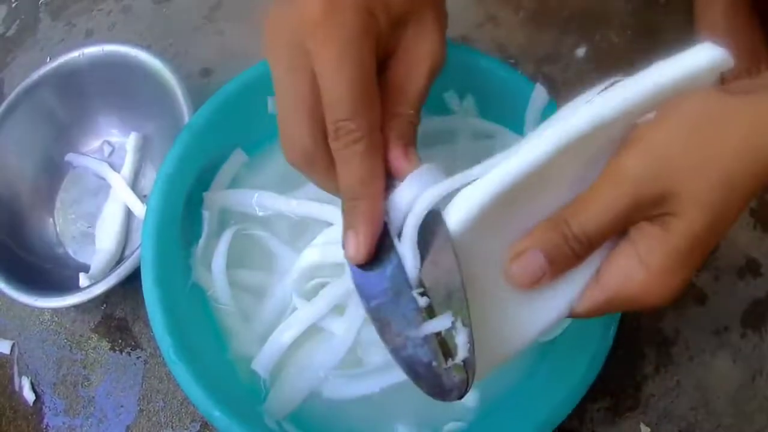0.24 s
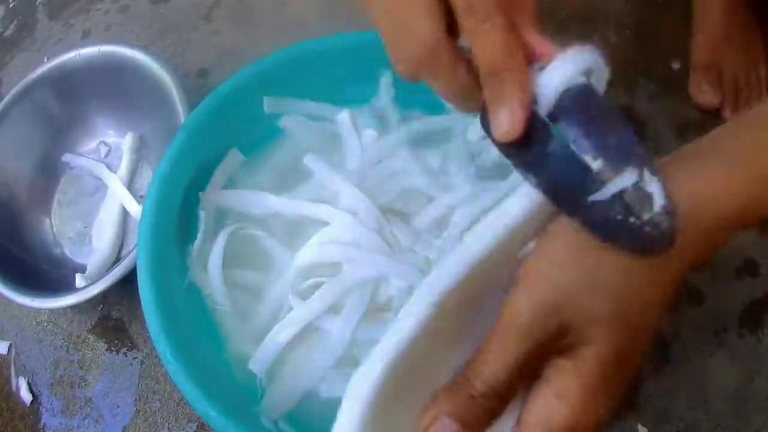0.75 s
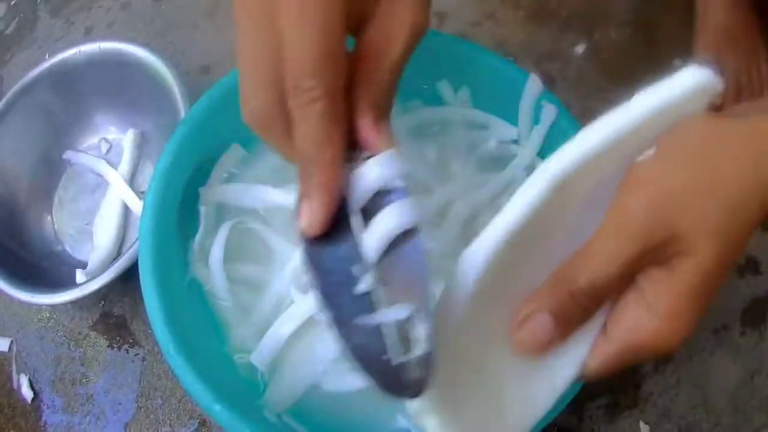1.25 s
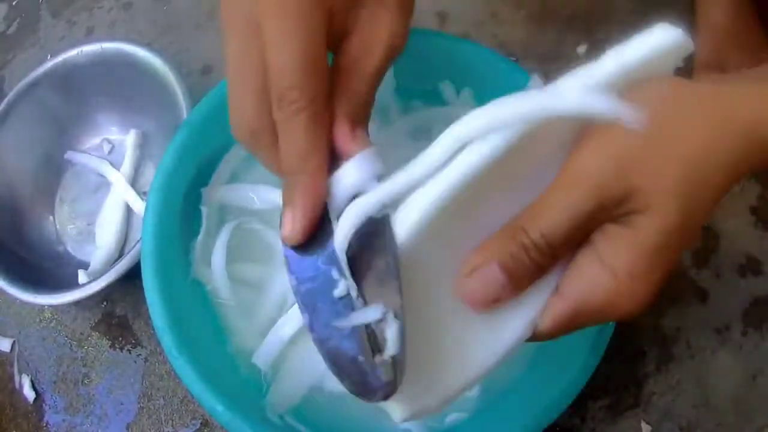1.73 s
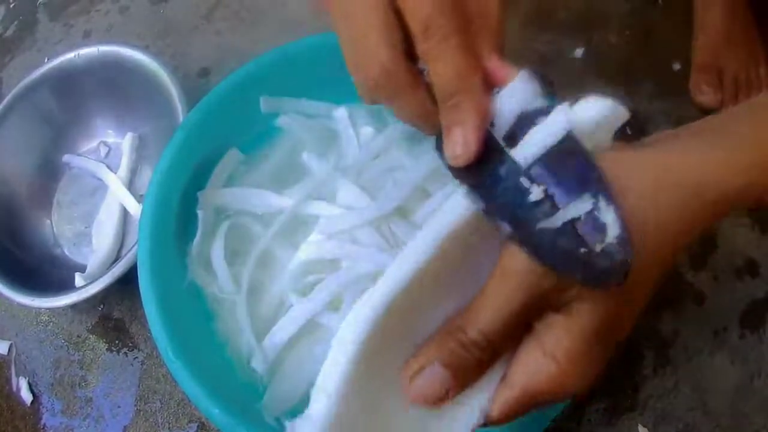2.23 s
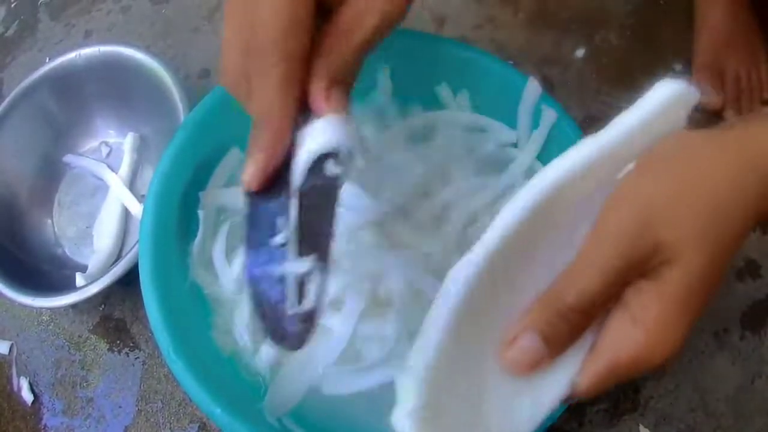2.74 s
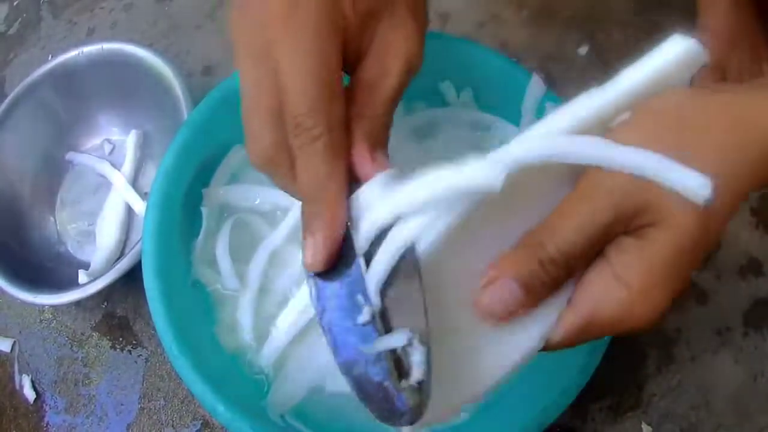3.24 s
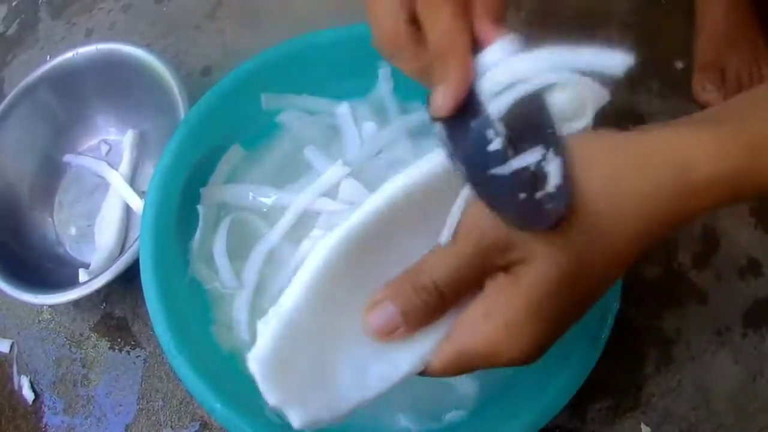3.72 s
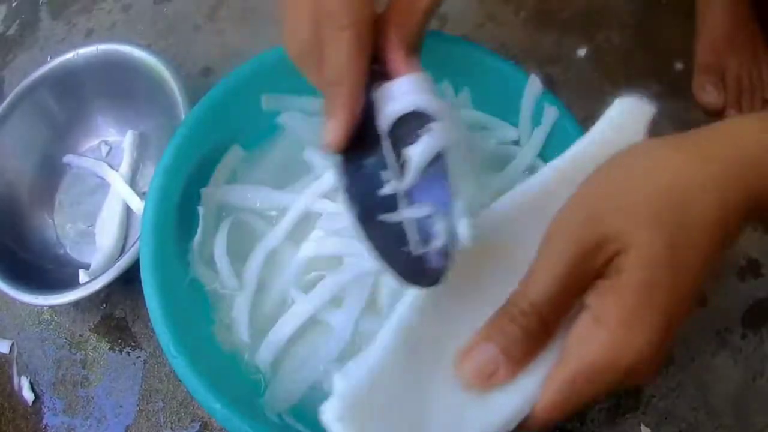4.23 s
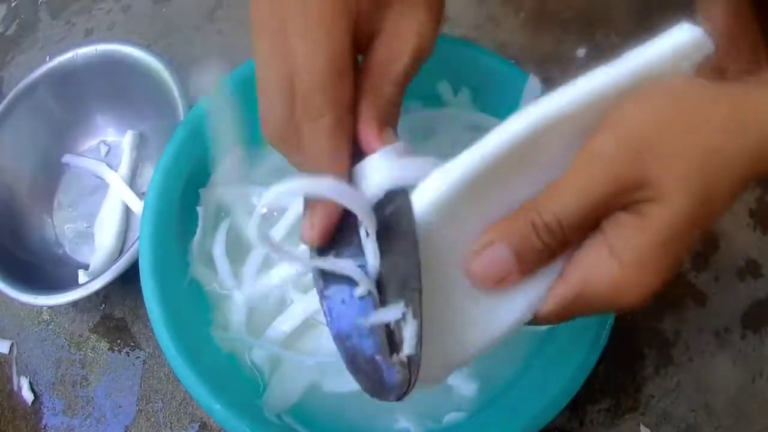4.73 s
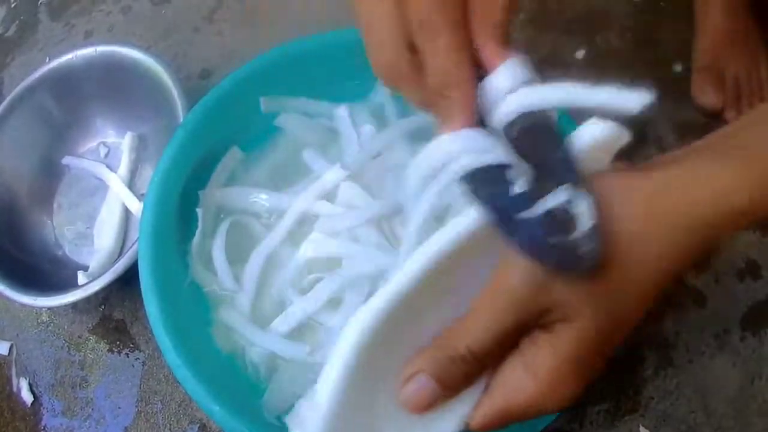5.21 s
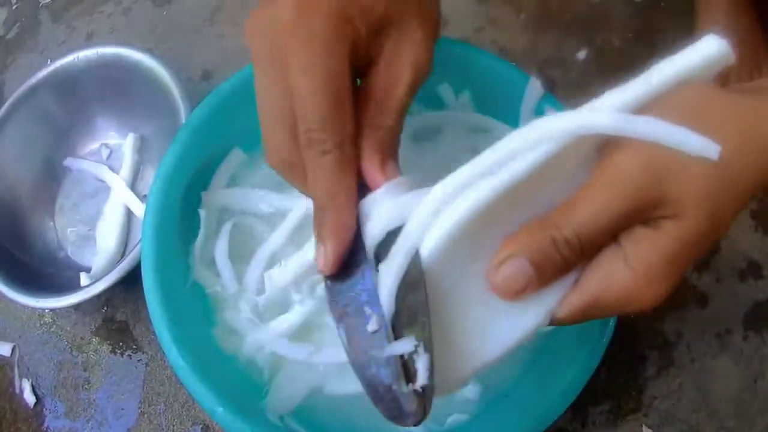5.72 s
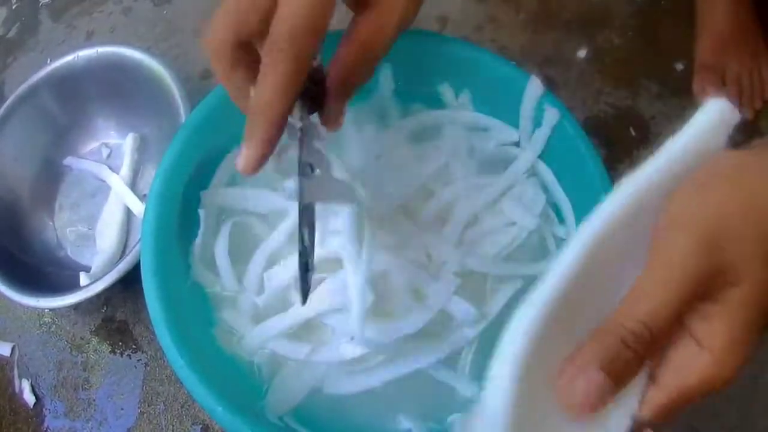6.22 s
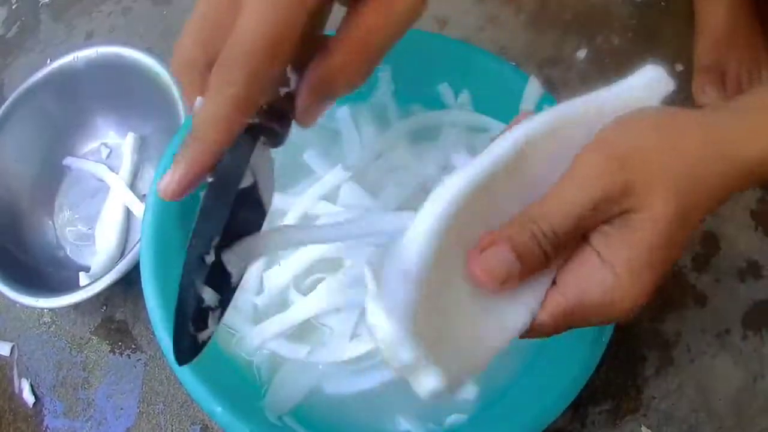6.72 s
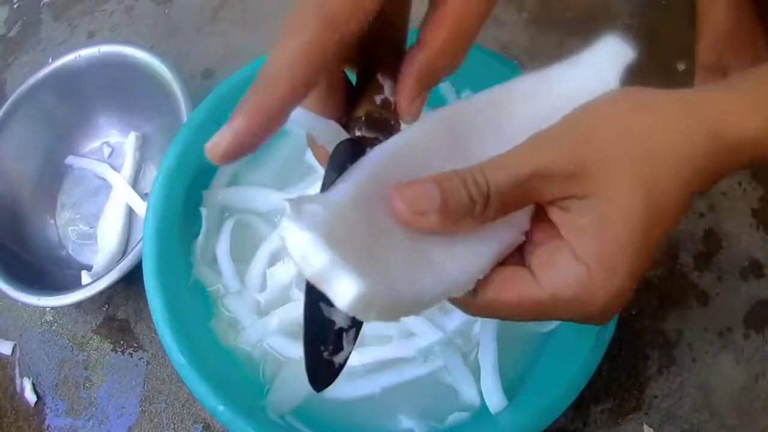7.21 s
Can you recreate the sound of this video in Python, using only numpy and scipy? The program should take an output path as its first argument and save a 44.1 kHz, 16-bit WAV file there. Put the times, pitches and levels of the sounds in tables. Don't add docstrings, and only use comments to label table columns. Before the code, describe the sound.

Repeated short tearing scrapes of a steel blade through firm coconut flesh, hollow clacks on the return, quick bird whistles and soft yard hum.

```python
import sys
import numpy as np
from scipy import signal
from scipy.fft import rfft, irfft
from scipy.io import wavfile
from scipy.ndimage import uniform_filter1d

SR = 44100
rng = np.random.default_rng(int(sys.argv[2]) if len(sys.argv) > 2 else 0)


def ratio(d):
    e = np.asarray(d, float) / 20
    return 10 ** e


def output_pcm(signal):
    pcm = np.clip(np.atleast_2d(signal).T, -1, 1) * 32767
    wavfile.write(sys.argv[1], SR, np.round(pcm).astype(np.int16))


N = 329074
T = np.arange(N) / SR


# start_s, length_s, pressure_db, bite_s (after the start), blade_ring_db (at the bite)
CUTS = [
    (0.03, .2, -53.5, 0.067, -50),
    (0.867, 0.22, -55, 0.062, -51.5),
    (1.568, .252, -53.5, 0.047, -48.5),
    (2.257, 0.22, -53, 0.035, -48),
    (3.076, .213, -54, 0.028, -48.5),
    (3.798, 0.206, -53, 0.06, -52.5),
    (4.527, 0.25, -55.5, 0.13, -51.5),
    (5.433, 0.25, -54, 0.029, -47.5),
]
# blade_ring_db, wet_hiss_db
BRUSH_TOUCHES = [(0.418, 0.07, -54, 0, -6.5), (0.519, .03, -53.5, -17, -17), (1.139, 0.044, -59, -5, -2.5),
                 (1.191, 0.038, -44, -23, -22), (1.874, 0.031, -60.5, -12, -6),
                 (2.632, 0.032, -55.5, -6, 2.5), (2.938, 0.057, -68, -2.5, -8),
                 (3.333, 0.033, -49, -9.5, -4.5), (3.363, .022, -51, -13, -9),
                 (4.02, 0.028, -56.5, -4, -4.5), (4.052, 0.039, -54, -4, -2.5),
                 (4.817, 0.069, -56, -3, -0.5), (4.985, .028, -59, -2, -2.5), (5.249, 0.025, -57, -15, -22),
                 (5.701, 0.074, -59, -4, -3), (5.85, 0.047, -52.5, -3, 2), (6.685, 0.087, -66, -4.5, -6),
                 (6.858, 0.067, -67, -8, -11), (1.413, 0.068, -59.5, -16, -16),
                 (2.857, 0.047, -67.5, -12, -12)]
# pitch_hz, width_hz, level_db
SLAB_MODES = [(770, 280, 0), (975, 350, 11.5), (1170, 110, 8.5), (1500, 280, 1)]
# pitch_hz, width_hz, level_db
OVERTONE_MODES = [(1910, 133, 4.5), (2194, 380, -2), (2830, 500, -9.5), (3250, 720, -11)]
# pitch_hz, width_hz, level_db
BLADE_MODES = [(4450, 570, -6.5), (4724, 93, -2.5), (4830, 520, 1), (5340, 490, -2)]
# pitch_hz, width_hz, level_db
TIP_MODES = [(5850, 260, 10), (6200, 290, -2.5)]
# pitch_hz, level_db
WET_OUTLINE = [(6300, -2), (7200, 0), (8300, 3.5), (9500, -1.5), (10700, -5.5), (12700, -5.5),
               (14000, -10.5), (15400, -15)]


def shredding():
    spots = np.linspace(WET_OUTLINE[0][0], WET_OUTLINE[-1][0], num=14)
    strips = [(hz, 520, np.interp(hz, *np.transpose(WET_OUTLINE))) for hz in spots]
    layers = [
        body(fibres(5000, 2.0, 2.5), BLADE_MODES, 1.8, 18),
        body(fibres(3500, 1.5, 2.2), SLAB_MODES, 2.5, 14),
        body(fibres(3000, 1.63, 2.8), OVERTONE_MODES, 1.1, 16),
        body(fibres(8000, 1.0, 3.0), strips, 3.0, 28),
        body(fibres(5000, 1.5, 2.5), TIP_MODES, 2.5, 18),
    ]
    gains = np.zeros((len(layers), N))
    for touch_levels, rows in ((cut, CUTS), (brush, BRUSH_TOUCHES)):
        for start_s, length_s, *how in rows:
            t = T[:int((length_s + 0.012) * SR)]
            fade = signal.windows.tukey(len(t), 0.1)
            for gain, db in zip(gains, touch_levels(t, length_s, *how)):
                add(gain, start_s, fade * ratio(db))
    hand = ratio(1.85 * walk(35))
    return np.sum(gains * layers, axis=0) * hand


def cut(t, length_s, pressure_db, bite_s, ring_db):
    land_s, lift_s, edge_db = 0.016, 0.012, -22
    lead_s = 0.015
    catch_s = 0.036
    choke_s, choke_db = 0.079, -6.5

    def contact(late_s):
        times = [late_s, late_s + land_s, length_s - lift_s, length_s + lift_s]
        return np.interp(t, times, [edge_db, 0, 0, edge_db])

    dig = 3.5 * (t / length_s - 0.5)
    pressure = pressure_db + contact(lead_s) + dig
    skim = -17 * np.clip((bite_s - t) / catch_s, 0, 1)
    ring_level = ring_db + contact(0) + skim
    sag = -30 * np.maximum(t - bite_s, 0)
    choke = choke_db * np.clip(1 - (length_s - t) / choke_s, 0, 1)
    blade = ring_level + sag + choke
    gathered = 57 * min(bite_s, 0.08)
    juice = np.interp(t - bite_s, [-catch_s, 0.008, 0.0043 + 0.085], [-21, -5, 0])
    wet = pressure_db + contact(0) - 2.5 + gathered + juice
    tip = ring_level - 23 + 14 * t / length_s
    return [blade, pressure, pressure - 2, wet, tip]


def brush(t, length_s, pressure_db, ring_db, wet_db):
    place = t / length_s
    swell = 1 - place / 0.41
    fade = (place - 1) / 0.44 + 0.5
    pressure = pressure_db - 17 * np.clip(np.maximum(swell, fade), 0, 1)
    blade = pressure + ring_db
    return [blade, pressure, pressure - 7.5, pressure + wet_db, blade - 8.5]


def fibres(per_s, scatter_db, judder_db):
    tears = rng.random(N) < per_s / SR
    sizes = ratio(scatter_db * rng.exponential(size=N)) * rng.standard_normal(N)
    return tears * sizes * ratio(judder_db * walk(90))


# start_s, peak_db, pitch_hz, rattle_db
EDGE_STRIKES = [
    (0.512, -19.5, 1300, -43),
    (1.185, -11.5, 1300, -24.5),
    (2.681, -10, 1287, -34.5),
    (3.403, -12.5, 1314, -25.5),
    (5.048, -20, 1266, -42),
]
# start_s, peak_db, pitch_hz, low_modes_db, high_modes_db
FLAT_TAPS = [(0.657, -27.5, 1100, 7, 3.5), (0.882, -40, 1070, -12, -18), (1.225, -17, 1080, -4, -9),
             (1.237, -5, 1146, -2.5, -10.5), (1.255, -50, 1150, -7, -23), (1.318, -42, 1150, -13, -3),
             (1.518, -48, 1080, -13, -4), (1.887, -64.5, 1410, -2, -16), (3.411, -30, 1210, -4, 2),
             (3.419, -19, 1234, -10.5, -15), (3.43, -30, 1210, -3, -5), (3.474, -33, 1250, -10.5, -2.5),
             (4.075, -39, 1153, 3, -17), (4.999, -46, 1170, 6, -15), (5.021, -35.5, 1050, -16, -17),
             (5.032, -52, 1120, -11, -5), (5.206, -35, 1230, -14, -3), (5.909, -41, 1500, -6, -4),
             (1.969, -46.5, 1500, -8, -5), (2.067, -45, 1500, -12, 3), (2.112, -53, 1500, -12, 0),
             (5.192, -48, 1500, -12, 0)]
# pitch_hz, level_db, fade_s (time to fall 60 dB)
SLAB_LOW = [(718, -5, 0.02), (821, 3, 0.017)]
# pitch_hz, level_db, fade_s (time to fall 60 dB)
SLAB_HIGH = [(1470, -1, 0.015), (1840, 6.5, 0.012), (2240, -6, 0.019), (2920, -23, 0.044)]
# pitch_hz, level_db, fade_s (time to fall 60 dB)
BASIN_THUMP = [(305, -21, 0.031)]


def knocks():
    out, thump, rattle = np.zeros((3, N))
    t = T[:int(0.08 * SR)]
    push_s, flex_s, main_fade_s = 0.00051, 0.00172, 0.012
    push = np.diff(np.hanning(int(push_s * SR) + 2))
    flex = np.diff(np.hanning(int(flex_s * SR) + 2))
    settle = ratio(-9 / (1 + np.exp((0.0068 - t) / 0.0006)))
    grip = (1 - np.exp(-t / 0.0011)) * settle

    hits = []
    for start_s, peak_db, hz, rattle_db in EDGE_STRIKES:
        hits.append((start_s, peak_db, hz, -35.5, -18.5, peak_db + rattle_db))
    for start_s, peak_db, hz, low_db, high_db in FLAT_TAPS:
        rattle_db = -53 + 0.73 * high_db + 0.17 * (peak_db + 30)
        hits.append((start_s, peak_db, hz, low_db, high_db, rattle_db))

    for start_s, peak_db, hz, low_db, high_db, rattle_db in hits:
        quick = ring(t, [(hz, 0, main_fade_s)]) + ratio(high_db) * ring(t, SLAB_HIGH)
        tap = np.convolve(quick, push)[:len(t)] * grip
        slow = np.convolve(ring(t, SLAB_LOW), flex)[:len(t)]
        tap += ratio(low_db + 9.5) * slow * (1 - np.exp(-t / 0.0033))
        gain = ratio(peak_db - 4.5) / np.abs(tap).max()
        add(out, start_s, gain * tap)
        add(thump, start_s, gain * (1 - np.exp(-t / 0.0019)) * ring(t, BASIN_THUMP))
        add(rattle, start_s + 0.0083, ratio(rattle_db - 60 * t / 0.083))

    out = signal.sosfilt(signal.butter(5, 580, "high", fs=SR, output="sos"), out)
    blur = rng.standard_normal(len(t)) * ratio(-60 * t / 0.055) * (t > 0.006)
    basin = signal.fftconvolve(out, blur / np.linalg.norm(blur))[:N]
    basin *= ratio(5 * walk(700))
    chatter = body(fibres(5000, 1.0, 2.0), BLADE_MODES, 1.5, 40)
    return out + thump + ratio(-19) * basin + ratio(-11.5) * rattle * chatter


# start_s, level_db, pitch_hz
HIGH_PEEPS = [
    (0.0, -51.5, 3920),
    (0.592, -50, 3926),
    (0.923, -50.5, 3940),
    (1.258, -56, 3920),
    (1.569, -53, 3940),
    (1.893, -56, 3930),
    (3.669, -51, 3930),
    (4.002, -53, 3920),
    (4.330, -52.5, 3940),
]
# start_s, level_db, pitch_hz
LOW_CALLS = [(0.1106, -54.5, 2296), (0.716, -53.5, 2276), (1.044, -56, 2250), (1.356, -59.5, 2280),
             (1.678, -59, 2210), (2.012, -59, 2210), (3.45, -55, 2205), (3.79, -57.5, 2250),
             (4.105, -57, 2263), (4.455, -57.5, 2240), (4.835, -58.5, 2270)]
# start_s, level_db
RISING_WHISTLES = [(.133, -56), (0.737, -55.5), (1.064, -53.5), (1.384, -54.5), (1.702, -57), (2.043, -56),
                   (3.476, -57.5), (3.813, -56), (4.136, -56), (4.479, -57.5), (4.869, -56)]
# time_s, pitch_hz, level_db
RISING_GLIDE = [(0, 2480, -3), (.007, 2880, -1), (.014, 3230, -1), (.022, 3440, -5), (.03, 3530, -16)]
# time_s, pitch_hz, level_db
FALLING_CALL = [(.315, 4840, -72), (.33, 4370, -69), (.37, 3770, -75), (.41, 2900, -80), (.43, 2550, -85)]
# time_s, pitch_hz, level_db
COO_CALL = [(6.215, 1620, -74), (6.24, 1605, -63), (6.27, 1615, -76)]
# delay_s, level_db
YARD_ECHOES = [(0, -26), (.005, 4), (.026, -1.5), (.045, -1), (.075, -10.5), (.11, -21.5), (.18, -22)]
# delay_s, level_db
NEAR_ECHOES = [(0, 0), (.015, -5), (.035, -13), (.07, -28)]


def birds():
    out = np.zeros(N)
    hoarse = walk(500)
    near_db, yard_db = -3, 6.5 + 2

    def call(start_s, glide, echoes, echo_db, rough=1):
        x = whistle(glide)
        x = x * ratio(3.5 * rough * hoarse[int(start_s * SR):][:len(x)])
        x = np.pad(x, (0, SR // 5))
        add(out, start_s, scattered(x, echoes, echo_db))

    for start_s, db, hz in HIGH_PEEPS:
        glide = [(0, 1.005 * hz, db - 16), (0.01, hz, db), (0.024, 0.997 * hz, db - 9)]
        call(start_s, glide, NEAR_ECHOES, near_db, 0.39)
    for (start_s, db, hz), (rise_s, rise_db) in zip(LOW_CALLS, RISING_WHISTLES):
        end_s = rise_s - start_s + 0.004
        glide = [(0, 0.94 * hz, db - 8), (0.01, hz, db), (end_s, 0.94 * hz, db - 1.5)]
        call(start_s, glide, NEAR_ECHOES, near_db, 0.75)
        detune = 1 + 0.01 * rng.standard_normal()
        glide = np.multiply(RISING_GLIDE, [1, detune, 1]) + [0, 0, rise_db]
        call(rise_s, glide, YARD_ECHOES, yard_db)
    call(FALLING_CALL[0][0], FALLING_CALL, [(0, 0), (0.06, -14)], 12, 1.5)
    call(COO_CALL[0][0], COO_CALL, NEAR_ECHOES, near_db, 0.3)
    return out


def whistle(rows):
    s, hz, db = np.transpose(rows)
    t = np.arange(s[0], s[-1], 1 / SR)
    turns = np.cumsum(np.interp(t, s, hz)) / SR
    loudness = ratio(np.interp(t, s, db)) * signal.windows.tukey(len(t), 0.2)
    return loudness * np.sin(2 * np.pi * turns)


# pitch_hz, width_hz, level_db
WING_MODES = [(5200, 610, -13.5), (6120, 200, -8), (7150, 280, -10.5), (7420, 300, -0.5), (8350, 1400, -7),
              (10240, 290, -3), (11070, 370, -7)]
# pitch_hz, level_db
CRICKET_LINES = [(6984, -89), (7089, -78), (7194, -84), (14178, -92), (14283, -96)]


def insects():
    strokes_hz = 110.75 * (1 + 0.0017 * walk(4.6))
    strokes = np.diff(np.floor(np.cumsum(strokes_hz) / SR), prepend=0)
    strokes *= ratio(1.5 * rng.standard_normal(N))
    buzz = scattered(body(strokes, WING_MODES, 1.4, 3), [(0, 5), (0.015, -23)], -2)
    out = level(buzz, -71)
    drift = np.cumsum(walk(6.4)) / SR
    for hz, db in CRICKET_LINES:
        throb = ratio(db + 3.5 + 1.4 * walk(15))
        out = out + throb * np.sin(2 * np.pi * hz * (T + 0.00088 * drift))
    return out


# pitch_hz, level_db (per Hz)
HUM_SPECTRUM = [(20, -24.5), (35, -22), (70, -25.5), (120, -18), (190, -22.5), (300, -29), (900, -32.5),
                (2000, -38.5), (4000, -44.5), (6500, -43), (9000, -45), (12000, -48), (14800, -48),
                (15600, -54)]


def yard():
    hz, db = np.transpose(HUM_SPECTRUM)
    f = np.maximum(np.arange(N // 2 + 1) * SR / N, 1)
    shape = ratio(np.interp(np.log(f), np.log(hz), db))
    hum = irfft(rfft(rng.standard_normal(N)) * shape, N)
    hum *= ratio(0.5 * walk(3))
    motor = body(rng.standard_normal(N), [(186, 14, 0)], 1.2, 3.1)
    return level(hum, -59) + level(motor, -68)


def body(x, modes, wander_db, rate):
    out = 0
    for hz, width_hz, db in modes:
        b, a = signal.iirpeak(hz, hz / (1.29 * width_hz), fs=SR)
        x = np.roll(x, 1237)
        rung = signal.lfilter(b, a, signal.lfilter(b, a, x))
        out = out + ratio(db + wander_db * walk(rate)) * rung
    return level(out, 0)


def ring(t, modes):
    return sum(ratio(db - 60 * t / fade_s) * np.sin(2 * np.pi * hz * t) for hz, db, fade_s in modes)


def scattered(x, rows, echo_db):
    s, db = np.transpose(rows)
    t = T[:int(s[-1] * SR)]
    echoes = rng.standard_normal(len(t)) * ratio(np.interp(t, s, db))
    echoes = echoes / np.linalg.norm(echoes)
    return x + ratio(echo_db) * signal.fftconvolve(x, echoes)[:len(x)]


def walk(rate):
    k = int(SR / rate)
    steps = np.repeat(rng.standard_normal(N // k + 1), k)
    return 1.3 * uniform_filter1d(uniform_filter1d(steps, k), k)[:N]


def level(x, db):
    return x * ratio(db) / np.sqrt(np.mean(x ** 2))


def add(out, start_s, x):
    i = int(start_s * SR)
    out[i:i + len(x)] += x[:N - i]


def scene():
    return (shredding() + knocks() + birds() + insects() + yard())[None]


def band_limit(x):
    return signal.sosfilt(signal.butter(12, 15690, fs=SR, output="sos"), x)


# start_s, end_s
TREBLE_GAPS = [
    (.507, .52),
    (.652, .678),
    (1.172, 1.255),
    (2.678, 2.692),
    (3.406, 3.43),
    (4.988, 4.995),
    (5.047, 5.062),
]


def record(dry):
    split = signal.butter(12, 8700, fs=SR, output="sos")
    dull = signal.sosfiltfilt(split, dry)
    gaps = sum(((T > start_s) & (T < end_s)) * 1. for start_s, end_s in TREBLE_GAPS)
    gaps = uniform_filter1d(uniform_filter1d(gaps, 200), 200)
    mix = dry + gaps * (dull - dry) - 0.0111
    return band_limit(mix)


dry = scene()
out = record(dry)
output_pcm(out)
```